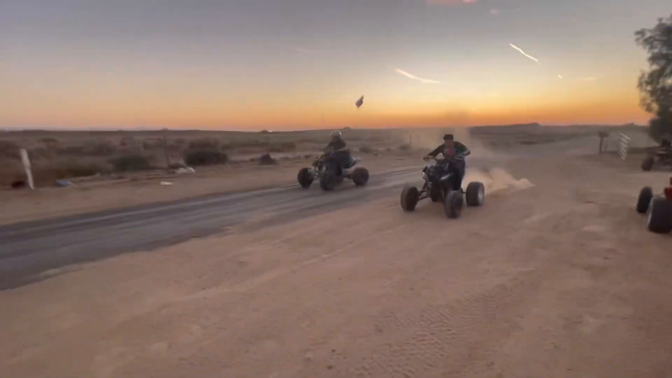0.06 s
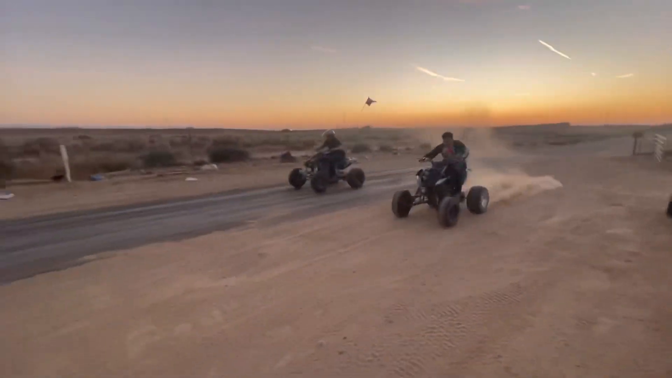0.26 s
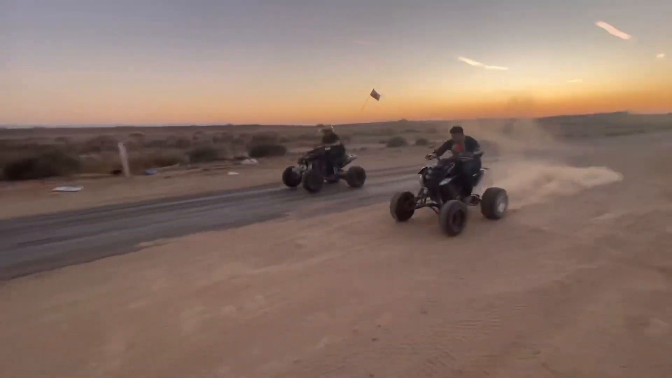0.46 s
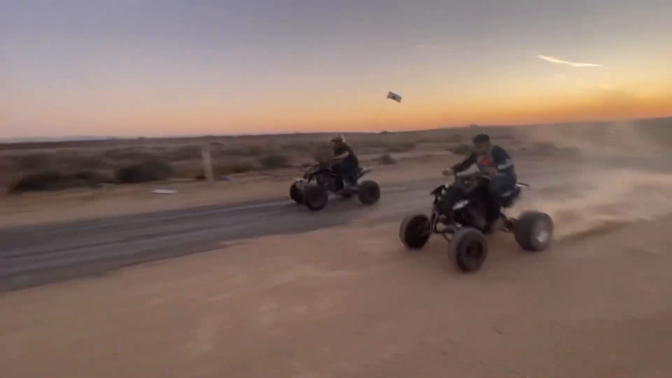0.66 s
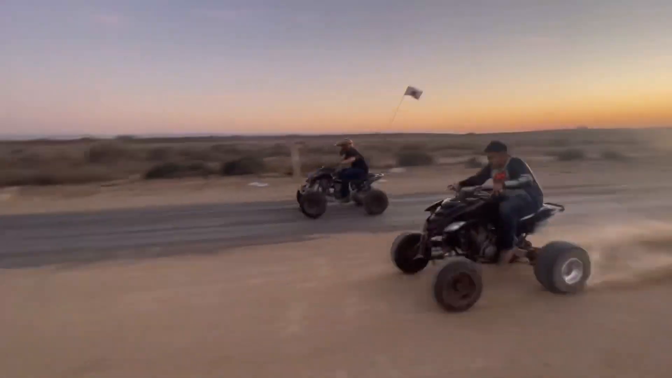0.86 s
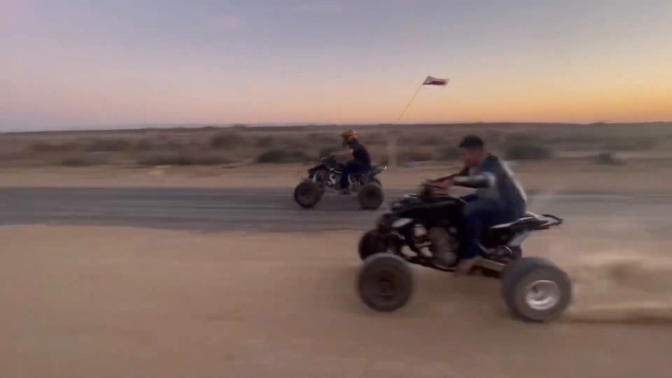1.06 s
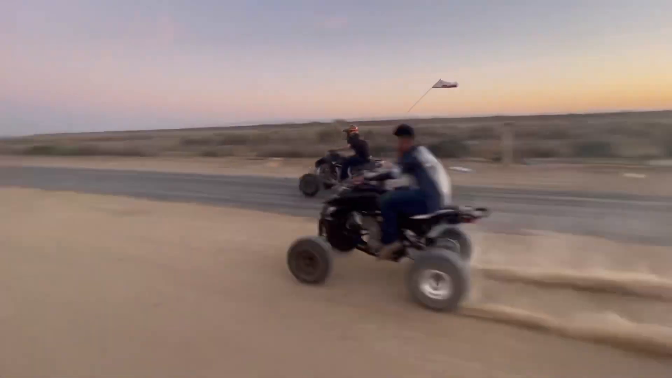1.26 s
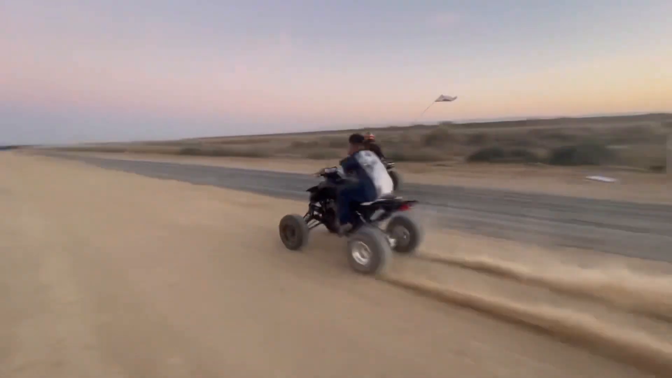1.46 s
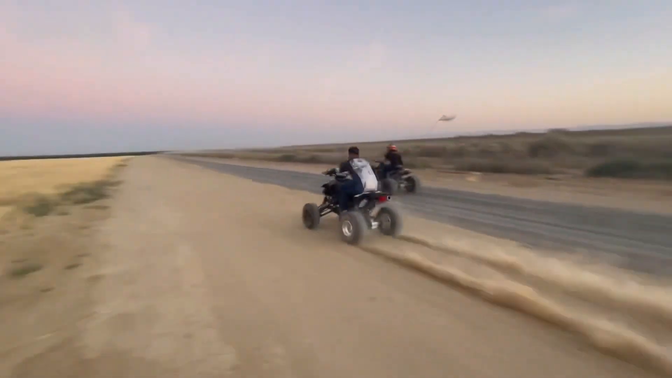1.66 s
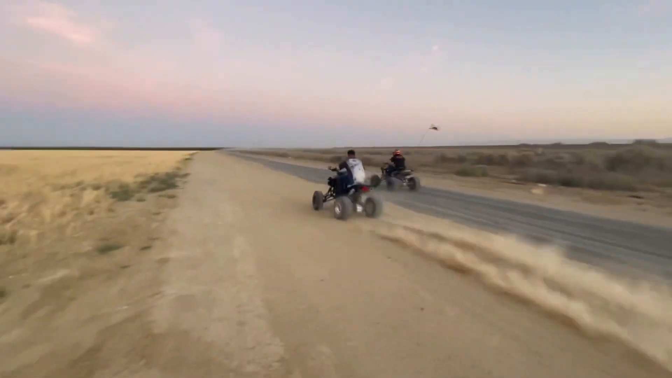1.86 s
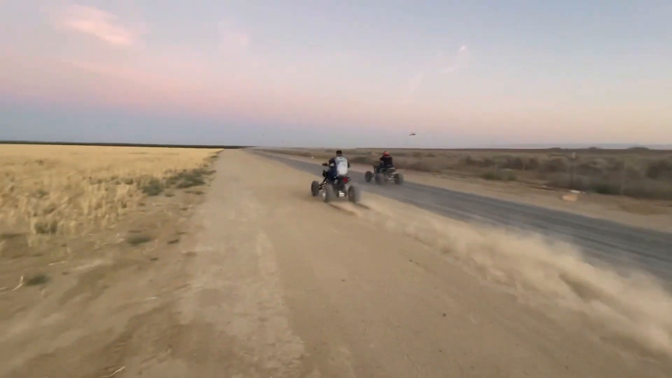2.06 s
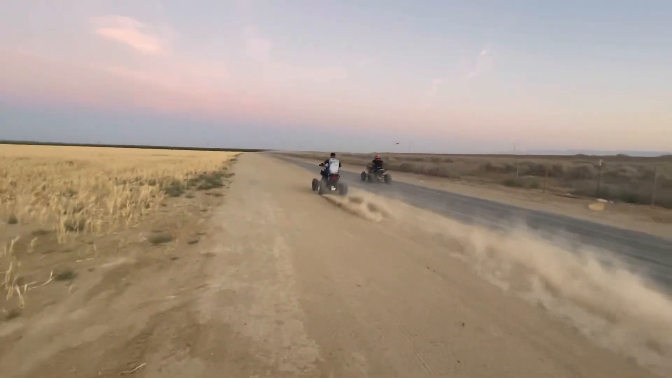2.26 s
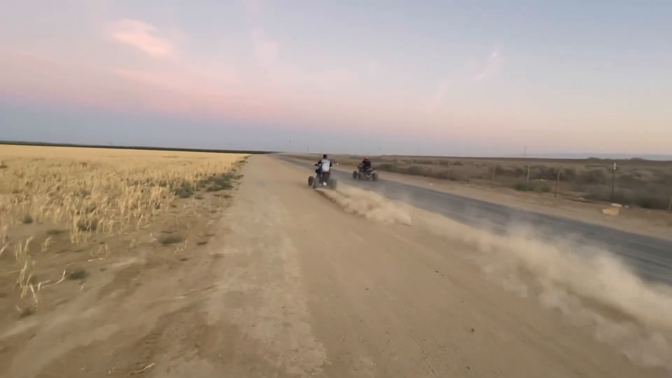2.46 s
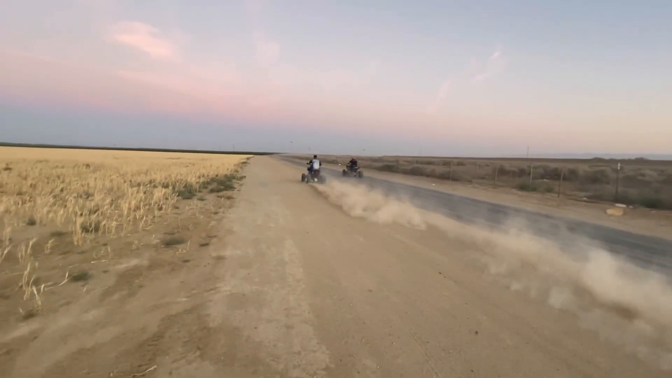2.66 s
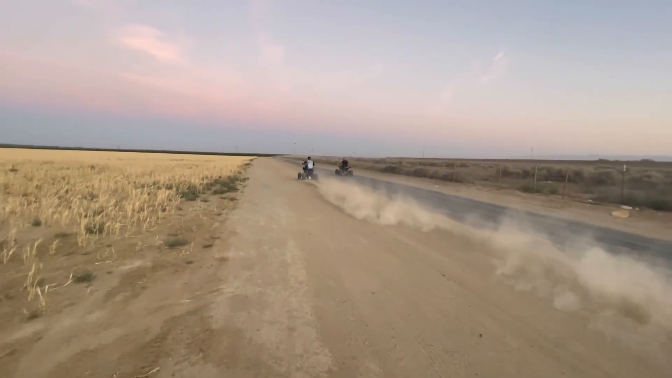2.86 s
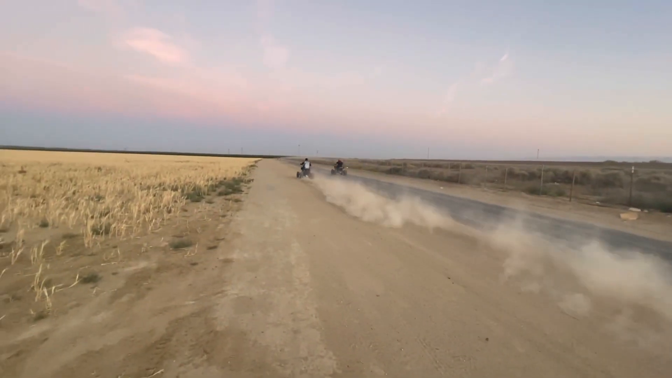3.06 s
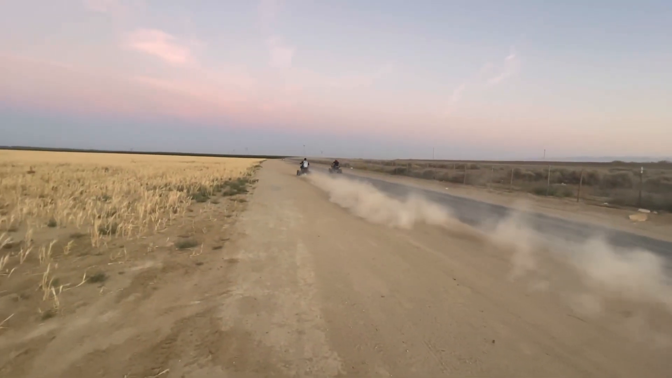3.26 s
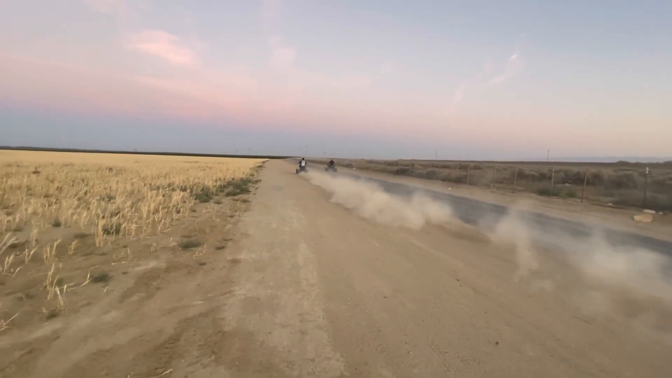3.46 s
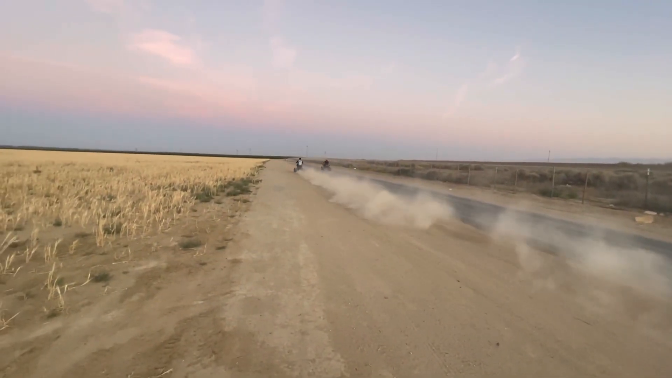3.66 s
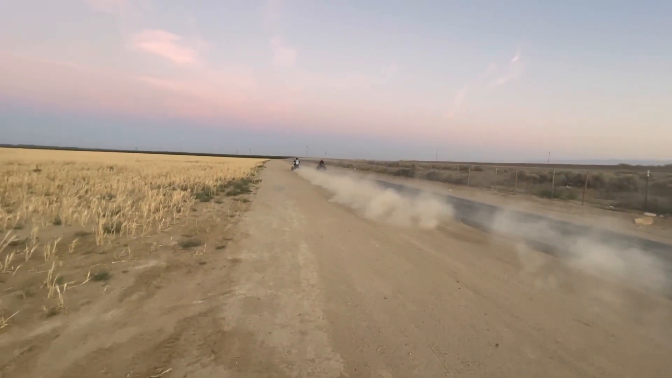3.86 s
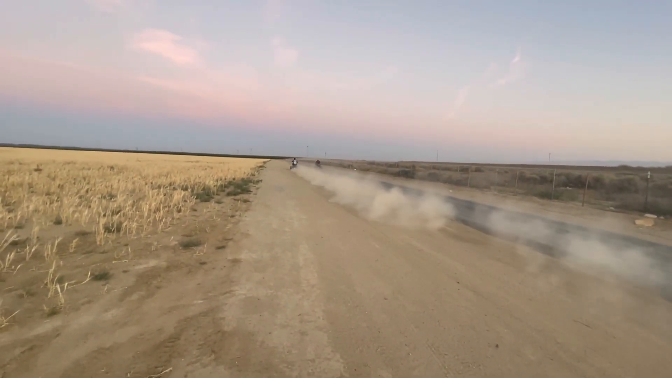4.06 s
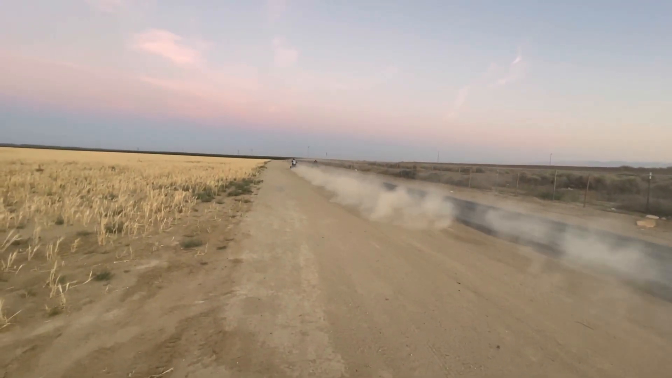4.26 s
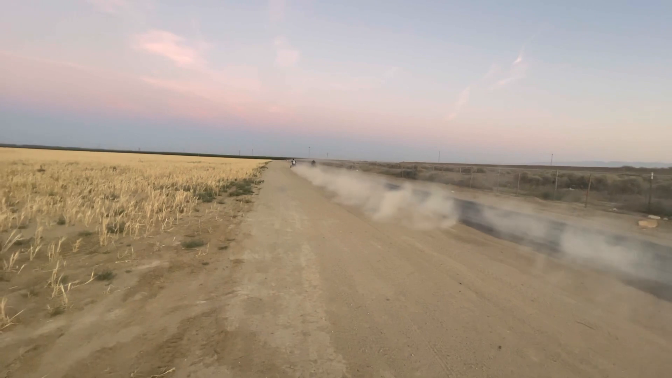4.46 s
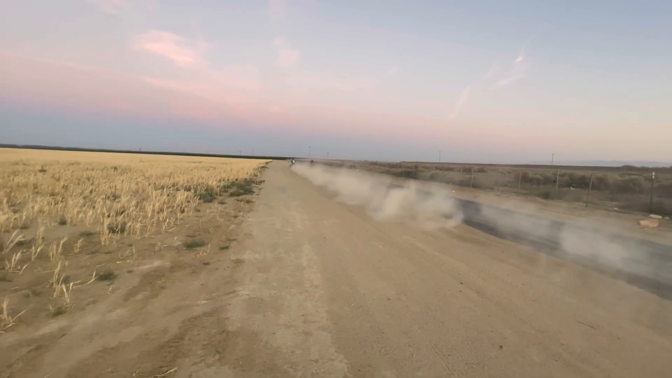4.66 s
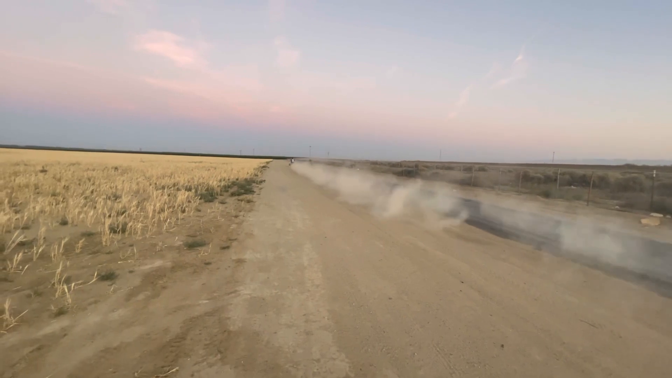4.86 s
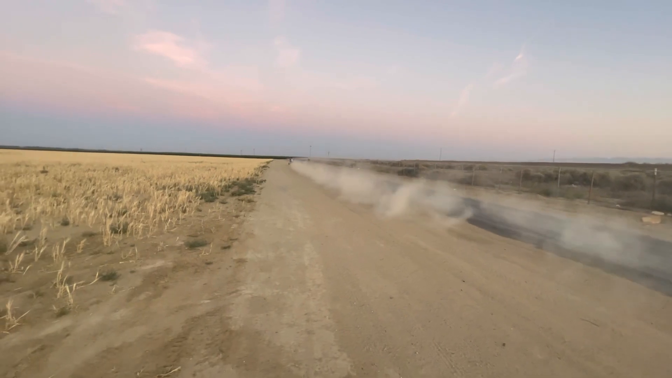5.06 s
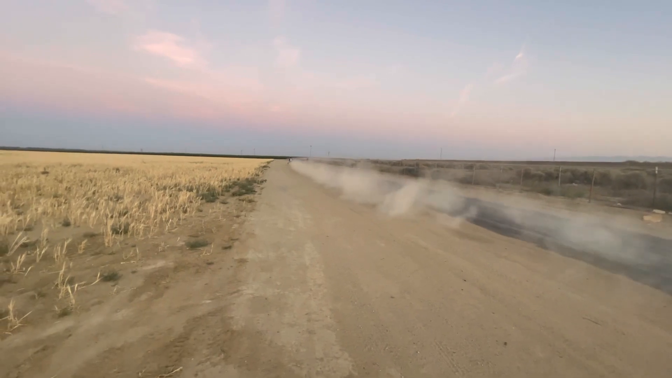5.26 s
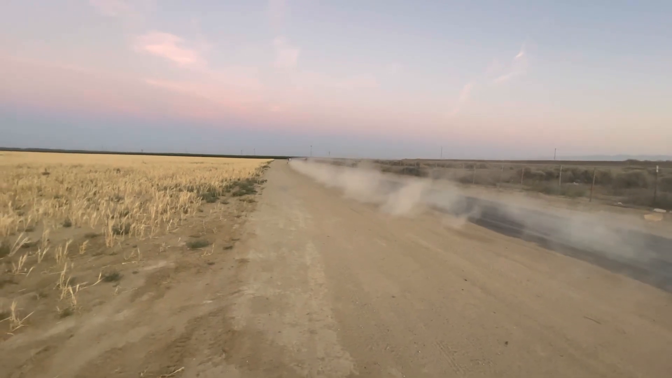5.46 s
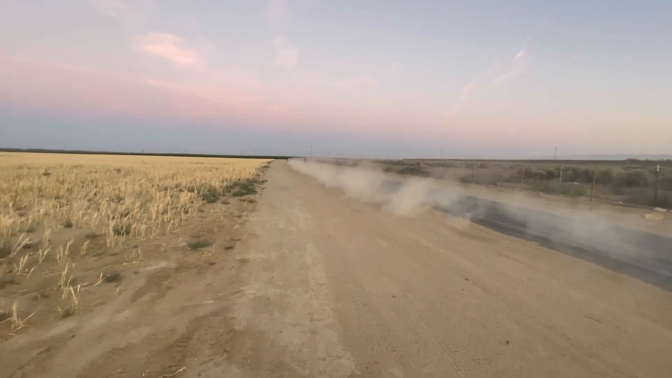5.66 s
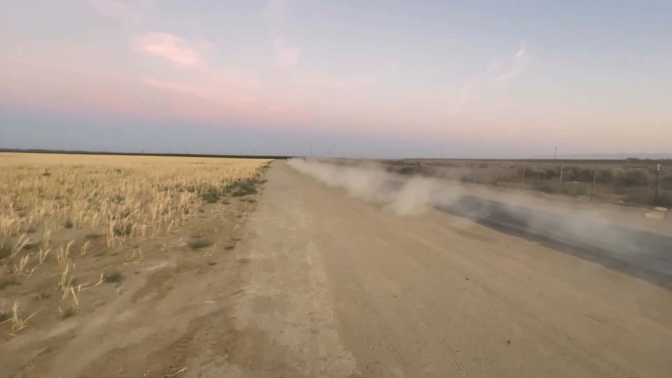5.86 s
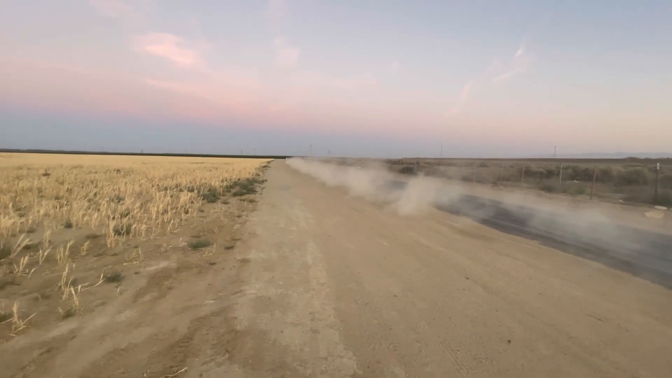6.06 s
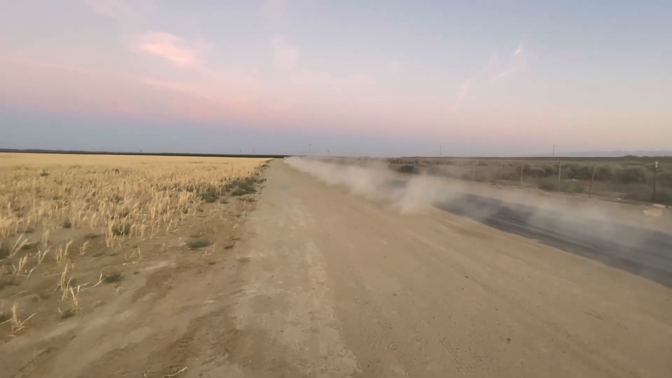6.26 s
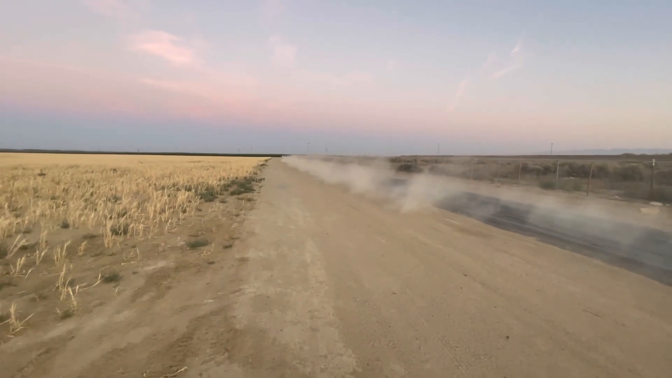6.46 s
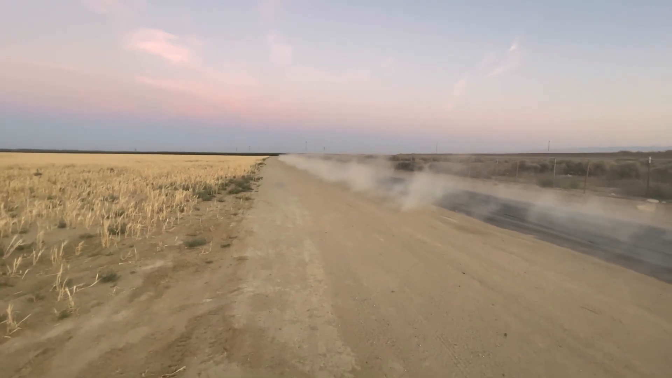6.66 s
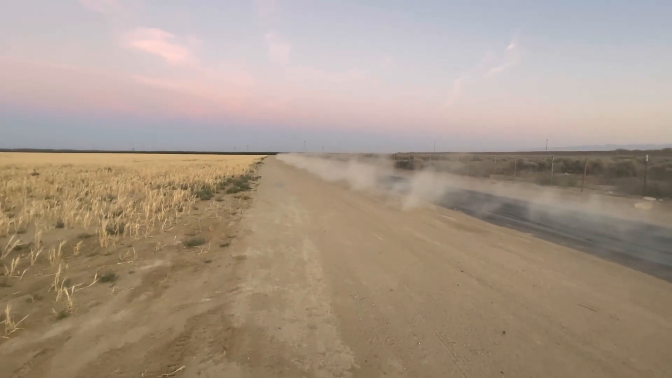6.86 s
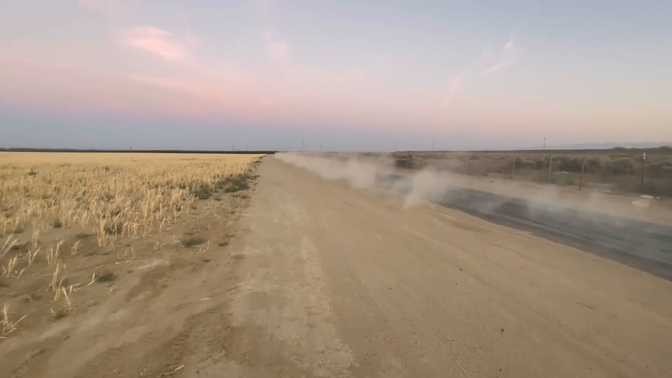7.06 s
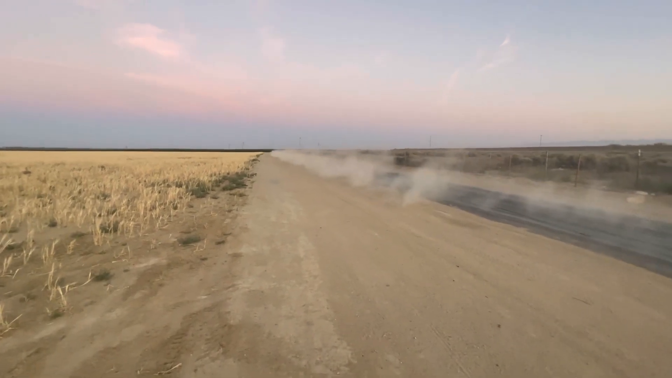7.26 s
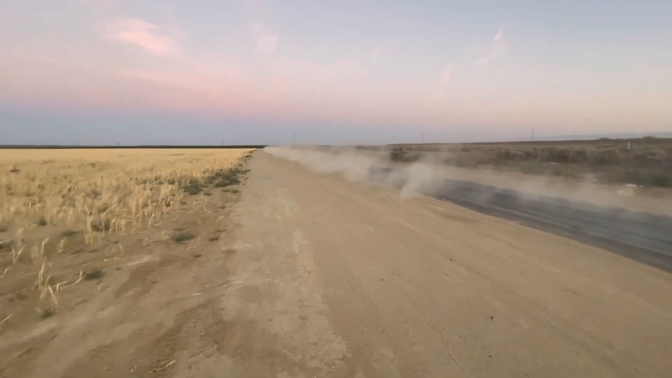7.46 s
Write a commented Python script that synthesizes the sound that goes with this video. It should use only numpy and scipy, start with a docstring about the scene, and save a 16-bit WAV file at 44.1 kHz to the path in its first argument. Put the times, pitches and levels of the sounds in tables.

```python
"""Two sport quads racing away

Two single-cylinder quads race away over dirt; the near one passes close by soon after the start.
Each of its firings gives an intake boom, a silencer thud and a shock that bounces in the tailpipe, with gas hiss.
It labours, spins its tyres and throws up dirt; the far one, a drone with a thin buzz, climbs through its gears.
A faint echo off the rough ground and a soft bed of open air lie behind them.
"""
import sys
import numpy as np
from scipy import signal
from scipy.fft import rfft, irfft
from scipy.io import wavfile
from scipy.ndimage import uniform_filter1d

SR = 44100
rng = np.random.default_rng(int(sys.argv[2]) if len(sys.argv) > 2 else 0)


def persist_wave(psi):
    """Save psi, clipped to +-1, as 16-bit WAV."""
    counts = np.round(np.clip(psi, -1, 1) * 32767).astype(np.int16)
    wavfile.write(sys.argv[1], SR, np.atleast_2d(counts).T)


N = 331632
TIME = np.arange(N) / SR


def from_db(db):
    """Decibels to gain."""
    return 10 ** (np.asarray(db) / 20)


def in_time(rows):
    """Reads a table whose first column is time, giving each other column at every sample."""
    seconds, *columns = np.transpose(rows)
    return [np.interp(TIME, seconds, column) for column in columns]


def during(start, end):
    """1 between two moments and 0 outside, with edges of about 9 ms, as quick as a throttle."""
    return uniform_filter1d(1.0 * ((TIME >= start) & (TIME < end)), size=400)


def waver(per_s):
    """Slow random wandering around 0 with a spread near 1: a new value per_s times a second."""
    steps = rng.standard_normal(1000)
    return np.interp(TIME * per_s, np.arange(len(steps)), steps)


def even(x):
    """Holds the loudness (rms) near 1 over a few firings, so that a level can be set afterwards."""
    power = np.atleast_2d(x ** 2).mean(axis=0)
    for _ in range(2):
        power = uniform_filter1d(power, size=3500)
    return x / np.sqrt(np.abs(power) + 1e-14)


def colour(x, spectrum):
    """Filters a sound to a drawn tone colour, with no ringing before the event (minimum phase)."""
    hz, db = np.transpose(spectrum)
    grid = np.fft.rfftfreq(2 ** 13, 1 / SR)
    drawn_db = np.interp(np.log(grid + 1), np.log(hz), db)
    cepstrum = irfft(np.log(from_db(drawn_db)))
    half = len(cepstrum) // 2
    # folding the cepstrum forwards in time makes the filter minimum phase
    folded = np.r_[cepstrum[0], 2 * cepstrum[1:half], np.zeros(half)]
    response = irfft(np.exp(rfft(folded)))[:half]
    return signal.oaconvolve(np.atleast_2d(x), response[None], axes=1)[:, :N]


def noise(likeness):
    """Stereo white noise; likeness is how alike left and right are (0 unrelated, 1 the same)."""
    mid, side = rng.standard_normal((2, N))
    return np.sqrt((1 + likeness) / 2) * mid + np.sqrt((1 - likeness) / 2) * side * [[1], [-1]]


def clicks(at, sizes):
    """Clicks at times that may fall between samples, shared by the two nearest samples."""
    where = np.clip(at * SR, 0, N - 2)
    i, part = where.astype(int), where % 1
    return np.bincount(i, sizes * (1 - part), N) + np.bincount(i + 1, sizes * part, N)


def delayed(x, late):
    """Reads every channel at the given earlier times."""
    return np.array([np.interp(late, TIME, channel) for channel in x])


def firings(revs, jitter_s, uneven_db):
    """Times and strengths of the combustions; no two are quite alike."""
    cycles = np.cumsum(revs) / SR - 1 / 4   # the first firing comes a quarter of a cycle in
    at = np.interp(np.arange(int(cycles[-1]) + 1), cycles, TIME)
    chance = rng.standard_normal((len(at), 2))
    return at + jitter_s * chance[:, 0], from_db(uneven_db * chance[:, 1])


def puffs(at, sizes, open_s, fade_s, leak):
    """Gas flow: full while the exhaust valve blows down, then fading, over a small steady leak."""
    age = TIME[:SR // 40]
    shape = np.exp(-np.maximum(age - open_s, 0) / fade_s)
    return signal.oaconvolve(clicks(at, sizes), shape)[:N] + leak


def run_past(abreast_s, closest_m, speed, acceleration):
    """Steady acceleration along a line: distance in m, and how much front is seen (1 nose, 0 tail)."""
    since = TIME - abreast_s
    along = speed * since + acceleration * since ** 2 / 2
    metres = np.hypot(along, closest_m)
    return metres, (1 - along / metres) / 2


def through_air(x, metres):
    """Air takes the treble with distance: a cross-fade along a ladder of low-pass filters."""
    dull_hz = 39000 / np.sqrt(metres)
    ladder = np.geomspace(2500, 20000, 5)   # cut-offs in Hz
    out = 0
    for hz, rung in zip(ladder, np.eye(len(ladder))):
        share = np.interp(np.log(dull_hz), np.log(ladder), rung)
        out = out + share * signal.sosfilt(signal.butter(2, hz, fs=SR, output="sos"), x)
    return out


def microphones(x, lead_ms):
    """A source off to the left reaches the right microphone later."""
    return np.array([x[0], np.interp(TIME - lead_ms / 1000, TIME, x[-1])])


# place of the near quad between the microphones; the far quad uses multiples of the lead:
# (time [s], lead at the left microphone [ms], left minus right level [dB])
BEARING = [(0, 0.076, -1.3), (.75, 0.088, -2), (1.15, 0.038, -1.5), (2.5, 0.16, -0.5), (4.8, .16, 1.3),
           (5.3, 0.15, 0), (7.52, .17, 1)]


def bearing():
    """Lead of the left microphone and left-right level difference, over time."""
    return in_time(BEARING)


# tone colour of the open air: (frequency [Hz], level [dB])
AIR_COLOUR = [(25, -16), (60, 4), (130, -5.5), (300, 5), (700, -14.5), (1500, -19.5), (4000, -31),
              (7000, -38), (11000, -92)]


def open_air():
    """A soft, steady bed of noise, nearly the same on both sides."""
    return from_db(-42.5) * even(colour(noise(.9), AIR_COLOUR))


def scrub(x, t60, echo_db):
    """Rough ground and bushes scatter a faint, dull tail that falls 60 dB in t60 seconds."""
    age = TIME[:SR // 2]
    tail = rng.standard_normal((2, len(age))) * from_db(-60 * age / t60) * (age > .004)
    tail = tail + tail.mean(axis=0) * 3   # makes left and right more alike
    tail /= np.sqrt(np.sum(tail ** 2, axis=1, keepdims=True))
    echo = signal.oaconvolve(x, tail, axes=1)[:, :N]
    dull = signal.butter(1, [250, 3000], "band", fs=SR, output="sos")
    return from_db(echo_db) * signal.sosfilt(dull, echo)


# tone colour of the sprayed dirt: (frequency [Hz], level [dB])
DIRT_COLOUR = [(100, -2.5), (400, 1), (1200, 1.5), (2500, -4.5), (4000, -13), (6500, -20), (8000, -25),
               (11500, -26), (14000, -51)]
# level rule of the spray: (base [dB], loss per doubling of distance [dB], gain from the front [dB],
# gain per octave of revs [dB], share of the level change in a gear change)
SPRAY_LEVEL = (-30, 6, 11.5, 7.5, .5)


def dirt():
    """Sand and grit sprayed by the tyres: countless grains of uneven size, made from noise."""
    grains = noise(0.43) * from_db(1.4 * rng.standard_normal(N))
    spray_db, = near_levels(SPRAY_LEVEL)
    return from_db(spray_db) * even(colour(grains, DIRT_COLOUR))


# one row per gear; the revs climb evenly, and the swell and shut-throttle changes below are added:
# (throttle open [s], throttle shut [s], first revs [firings/s], last revs [firings/s],
#  drone level [dB], first rasp level [dB], last rasp level [dB])
FAR_GEARS = [(0, 0.596, 58.7, 73, -23, -42, -38), (0.796, 1.612, 60, 76.5, -26.5, -48, -33),
             (1.919, 2.78, 61, 79, -29.5, -30.5, -39), (2.944, 4.372, 66.2, 78.5, -31, -46, -50),
             (4.6, 6.76, 67, 78.93, -31.5, -49, -46), (6.945, 7.6, 63, 65.1, -32.5, -52, -55)]
FAR_SWELL_DB = 1   # the drone grows this much through each pull
FAR_SHUT_DRONE_DB, FAR_SHUT_RASP_DB = -3.5, -35   # change while the throttle is shut


def far_pulls():
    """Revs, drone level and rasp level of the far quad: up through each gear, down in each change."""
    corners = []
    for opens, shuts, first, last, drone_db, first_rasp_db, last_rasp_db in FAR_GEARS:
        corners += [(opens, first, drone_db - FAR_SWELL_DB / 2, first_rasp_db),
                    (shuts, last, drone_db + FAR_SWELL_DB / 2, last_rasp_db)]
    revs, drone_db, rasp_db = in_time(corners)
    shut = 1 - sum(during(*gear[:2]) for gear in FAR_GEARS)
    return revs, drone_db + FAR_SHUT_DRONE_DB * shut, rasp_db + FAR_SHUT_RASP_DB * shut


# tone colours of the far quad: (frequency [Hz], level [dB])
FAR_DRONE_COLOUR = [(30, -58), (72, -3.5), (150, 1.5), (225, -3), (300, -0.5), (380, -3.5), (460, -12.5),
                    (750, -4.5), (1100, -14), (2500, -73.5)]
FAR_RASP_COLOUR = [(700, -38), (1400, -8), (1900, -19.5), (2300, -1.5), (2800, -3), (3400, -20),
                   (6200, -20), (8000, -25), (14000, -29.5)]
# its run: (time abreast [s], closest distance [m], speed abreast [m/s], acceleration [m/s2])
FAR_RUN = (0.59, 24, 6.3, 2.1)


def far_quad():
    """A deep drone with a thin buzzing crack on each firing; the crack dies when the throttle shuts."""
    revs, drone_db, rasp_db = far_pulls()
    metres, _ = run_past(*FAR_RUN)
    lead_ms, _ = bearing()
    at, sizes = firings(revs, jitter_s=.000025, uneven_db=.9)
    drone = from_db(drone_db) * even(colour(clicks(at + 0.00079, sizes), FAR_DRONE_COLOUR))
    flow = puffs(at, sizes ** 2, open_s=.0016, fade_s=.0018, leak=.12)
    buzz = even(clicks(at, sizes ** 2)) + .75 * even(flow * noise(.6))
    rasp = from_db(rasp_db) * even(through_air(colour(buzz, FAR_RASP_COLOUR), metres))
    placed_drone = microphones(drone, 2.5 * lead_ms) * from_db([[-.7], [.7]])
    return placed_drone + microphones(rasp, 0.58 * lead_ms)


# gear changes of the near quad; each part takes its own share of the level changes:
# (throttle shut [s], throttle open [s], flare of the revs, a dip if negative [firings/s],
#  exhaust level change while shut [dB], silencer level change while shut [dB])
NEAR_SHIFTS = [(.215, .385, -1.7, -7, 3), (1.738, 1.83, 8.85, -26, 0), (5.03, 5.16, 7.1, -13, 0)]


def shift_drop(column=3):
    """Change of level in dB while the near quad's throttle is shut (column 3 exhaust, 4 silencer)."""
    return sum(row[column] * during(*row[:2]) for row in NEAR_SHIFTS)


# near engine in gear, as the tyres slip and grip: (time [s], revs [firings/s])
NEAR_SPEED = [(0.0, 71.09), (0.165, 71.05), (0.553, 50.99), (0.797, 57.57), (1.024, 60.18), (1.097, 57.13),
              (1.488, 61.93), (1.731, 59.34), (2.103, 47.48), (2.23, 50.27), (3.279, 50.77), (3.766, 53.16),
              (4.103, 51.1), (4.552, 55.29), (4.99, 61.87), (5.295, 51.49), (6.088, 52.0), (7.52, 55.44)]
# the flare lasts until the clutch bites: (time after the throttle opens [s], share of the flare [0-1])
FLARE = [(-.03, 0), (.07, 1), (.21, 0)]


def near_revs():
    """Firings per second in gear, and the extra ones (the flare) around each gear change."""
    in_gear, = in_time(NEAR_SPEED)
    flares = sum(flare * np.interp(TIME - opens, *np.transpose(FLARE))
                 for _, opens, flare, _, _ in NEAR_SHIFTS)
    return in_gear + flares, flares


# run of the near quad: (time abreast [s], closest distance [m], speed abreast [m/s], acceleration [m/s2])
NEAR_RUN = (1.126, 3.25, 7.65, 2.87)
CRUISE_FIRINGS_PER_S = 55   # revs at which the revs add nothing to the level
KICK_DB_PER_FLARE = 0.36   # louder while the clutch slips, per firing/s of flare


def near_levels(*rules, column=3):
    """Levels in dB of parts of the near quad, from its distance, facing, revs and throttle."""
    metres, front = run_past(*NEAR_RUN)
    revs, flares = near_revs()
    drop_db = shift_drop(column)
    doublings = np.log2(metres / metres.min())
    octaves = np.log2(revs / CRUISE_FIRINGS_PER_S)
    kick_db = KICK_DB_PER_FLARE * flares
    return [base - loss * doublings + facing * front + revving * octaves + share * drop_db + kick_db
            for base, loss, facing, revving, share in rules]


# tone colour of the intake: (frequency [Hz], level [dB])
INTAKE_COLOUR = [(25, -60.5), (40, -12), (55, 2.5), (72, 0.5), (108, 8.5), (140, 1.5), (175, -4.5),
                 (215, -4), (280, -19), (400, -19), (490, -10), (800, -70.5)]
# its level rule, before a small trim; columns as in SPRAY_LEVEL
INTAKE_LEVEL = (-25, 4, 9.5, 11, 1)


def intake_boom(at, sizes):
    """Each firing brings a deep boom from the intake."""
    level_db, = near_levels(INTAKE_LEVEL)
    return from_db(level_db + 1.44) * even(colour(clicks(at + .0014, sizes), INTAKE_COLOUR))


# tone colour of the silencer: (frequency [Hz], level [dB])
SILENCER_COLOUR = [(50, -36.5), (150, -7.5), (210, -5.5), (300, 0), (365, -3), (460, -17), (700, -34.5),
                   (1500, -100)]
# its level rule, before a small trim; columns as in SPRAY_LEVEL
SILENCER_LEVEL = (-24, 1.54, 1.5, -16.5, 3)


def silencer_thud(at, sizes):
    """Each firing thuds in the silencer, a little stronger on the right."""
    level_db, = near_levels(SILENCER_LEVEL, column=4)
    thud = even(colour(clicks(at + 0.002295, sizes), SILENCER_COLOUR))
    return from_db(level_db - 2.5) * thud * from_db([[-.6], [.6]])


# the airbox mouth honks forwards only; its tone colour: (frequency [Hz], level [dB])
HONK_COLOUR = [(500, -24.5), (900, -23.5), (1150, 0.5), (1400, 3.5), (1650, -7), (1950, -15), (2150, -15),
               (3000, -42)]
# its level against the rasp's level rule as the quad goes by: (time [s], level [dB])
HONK_FACING = [(0, 2), (.45, 7.5), (.8, -3), (1.15, -2), (1.45, -31), (2.2, -38), (7.52, -44)]


def airbox_honk(at, sizes, rasp_db):
    """The airbox mouth honks on each firing and fades once the quad turns its tail."""
    facing_db, = in_time(HONK_FACING)
    return from_db(rasp_db + facing_db) * even(colour(clicks(at + 0.00042, sizes), HONK_COLOUR))


# ring of the near tailpipe: (time [s], round trips per second [Hz])
PIPE_RING = [(0, 690), (.3, 720), (.42, 1110), (.6, 866), (1.0, 900), (1.15, 1110), (1.35, 785), (1.7, 850),
             (2.4, 763), (5, 753), (6, 838), (7.52, 777)]


def tailpipe(at, sizes, trips, scatter_s):
    """The shock of each firing leaves the pipe again after every round trip."""
    trip_s = 1 / np.interp(at, *np.transpose(PIPE_RING))
    chance = rng.standard_normal((len(at), len(trips), 2))
    shocks = 0
    for k, share in enumerate(trips):
        leaves = at + k * (trip_s + scatter_s * chance[:, k, 0])
        shocks = shocks + clicks(leaves, sizes * share * from_db(1.5 * chance[:, k, 1]))
    return shocks


def pipe_echo(x, echo):
    """Gas noise also makes the round trip of the pipe, which ridges it at the pipe's harmonics."""
    return even(x + echo * delayed(x, TIME - 1 / in_time(PIPE_RING)[0]))


# tone colour of the bark: (frequency [Hz], level [dB])
BARK_COLOUR = [(200, -29.5), (450, -16), (680, 2), (900, 0), (1150, -0.5), (1600, -17), (3000, -56.5)]
# its level on open throttle, before a small trim: (time [s], level [dB])
BARK_DB = [(0, -19.5), (.42, -22.5), (.72, -15), (1.1, -16), (1.6, -13), (1.9, -18.5), (2.15, -29.5),
           (2.4, -26.5), (3.8, -25.5), (4.9, -26.5), (5.4, -33.5), (7.52, -31.5)]


def tailpipe_bark(shocks):
    """The bouncing shocks bark from the tailpipe; the level drops while the throttle is shut."""
    level_db = in_time(BARK_DB)[0] + shift_drop()
    return from_db(level_db - 2.08) * even(colour(shocks, BARK_COLOUR))


PIPE_HEIGHT_M, MICROPHONE_HEIGHT_M = 0.714, 1.507
SOUND_SPEED = 343   # m/s


def over_ground(x, metres, bounce):
    """The ground mirrors the pipe; the echo closes up with distance and sweeps a comb through the sound."""
    direct = np.hypot(metres, MICROPHONE_HEIGHT_M - PIPE_HEIGHT_M)
    mirrored = np.hypot(metres, MICROPHONE_HEIGHT_M + PIPE_HEIGHT_M)
    return x + bounce * delayed(x, TIME - (mirrored - direct) / SOUND_SPEED)


# tone colours of the exhaust's rasp and hiss: (frequency [Hz], level [dB])
RASP_COLOUR = [(400, -36.5), (800, -6), (1150, 6.5), (1450, 2.5), (1850, -1.5), (2350, -1.5), (3000, -4.5),
               (3700, -13), (4400, -10), (6400, -40.5), (10000, -57)]
HISS_COLOUR = [(1200, -7.5), (2600, 8.5), (4000, 2.5), (5200, 2), (6400, 1.5), (7800, -10), (10500, -5),
               (13500, -15.5), (16000, -29.5)]
# their swelling and waning, added to both: (time [s], level [dB])
EDGE_DB = [(0, 2.5), (.7, -3), (1.4, 1), (2.0, 1.5), (2.65, 1.5), (3.15, -5), (4.5, -1), (6.1, 1), (7.0, 3),
           (7.52, 0.5)]
HISS_WAVER_DB, HISS_WAVER_PER_S = 2.3, 16   # spread, and new random values per second


def rasp_and_hiss(at, sizes, shocks, rasp_db, hiss_db):
    """Steep shocks and turbulent gas leave the pipe, and reach us through the air and off the ground."""
    metres, _ = run_past(*NEAR_RUN)
    edge_db, = in_time(EDGE_DB)
    # the first shock has the steepest front and cracks the most; turbulent gas follows it
    crack = even(shocks + 0.67 * clicks(at, sizes))
    flow = puffs(at, sizes ** 2, open_s=.003, fade_s=.0012, leak=.07)
    gas = pipe_echo(flow * noise(0.37), echo=0.48)
    rasp = over_ground(colour(crack + .62 * gas, RASP_COLOUR), metres, bounce=0.31)
    hiss = over_ground(colour(0.06 * crack + gas, HISS_COLOUR), metres, bounce=0.06)
    waver_db = HISS_WAVER_DB * waver(HISS_WAVER_PER_S)
    rasp = from_db(rasp_db + edge_db) * even(through_air(rasp, metres))
    hiss = from_db(hiss_db + edge_db + waver_db) * even(through_air(hiss, metres))
    return rasp + hiss


# level rules of the rasp and the hiss; columns as in SPRAY_LEVEL
RASP_LEVEL = (-20.5, 5.5, -5.5, 16.5, 1.5)
HISS_LEVEL = (-28.5, 5.5, -4.5, 8.5, 0.5)


def near_quad():
    """One train of firings drives intake, airbox, silencer, tailpipe and gas jet."""
    revs, _ = near_revs()
    rasp_db, hiss_db = near_levels(RASP_LEVEL, HISS_LEVEL)
    at, sizes = firings(revs, jitter_s=.00003, uneven_db=.7)
    shocks = tailpipe(at, sizes, trips=[1.0, 0.84, 0.55, 0.12], scatter_s=1 / SR / 2)
    engine = intake_boom(at, sizes) + silencer_thud(at, sizes) + airbox_honk(at, sizes, rasp_db)
    engine = engine + tailpipe_bark(shocks) + rasp_and_hiss(at, sizes, shocks, rasp_db, hiss_db)
    lead_ms, pan_db = bearing()
    return microphones(engine, lead_ms) * from_db(pan_db / 2 * [[1], [-1]])


def scene():
    """The open air, the thrown dirt, and both quads with their echo."""
    quads = far_quad() + near_quad()
    return open_air() + dirt() + scrub(quads, t60=0.089, echo_db=-15.5) + quads


def record(dry):
    """The microphones pass no deep rumble, the highest peaks are rounded and the top is cut."""
    heard = signal.sosfilt(signal.butter(1, 12, "high", fs=SR, output="sos"), dry)
    rounded = 1.694 * np.tanh(heard / 1.507)
    # 60 dB down from 16.6 kHz upwards
    return signal.sosfilt(signal.cheby2(14, 60, 16600, fs=SR, output="sos"), rounded)


dry = scene()
out = record(dry)
persist_wave(out)
```